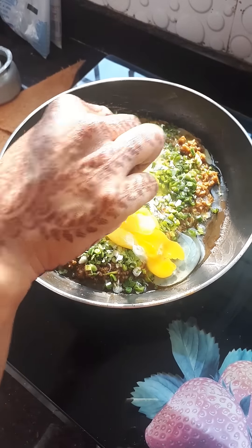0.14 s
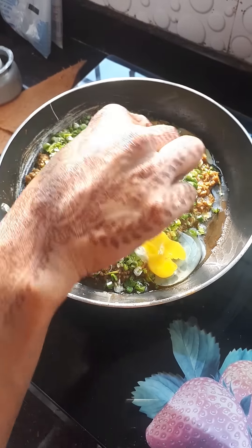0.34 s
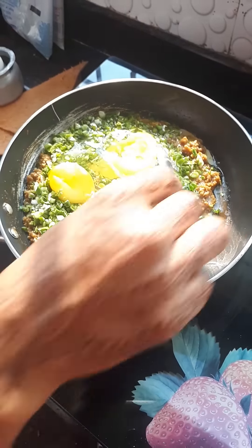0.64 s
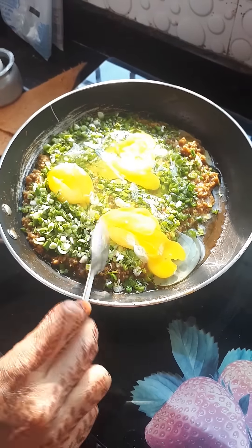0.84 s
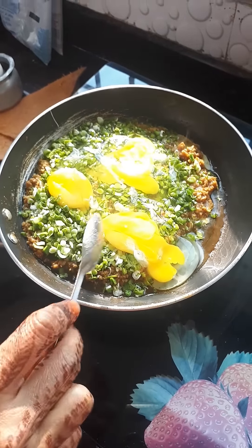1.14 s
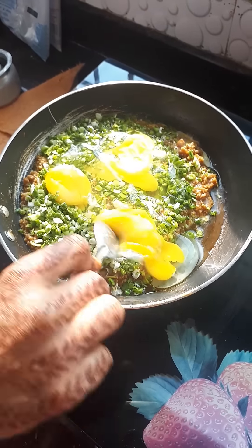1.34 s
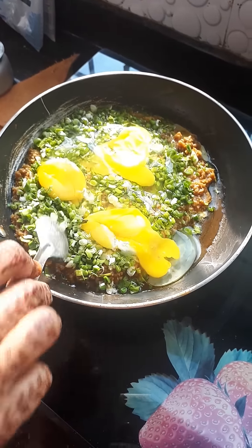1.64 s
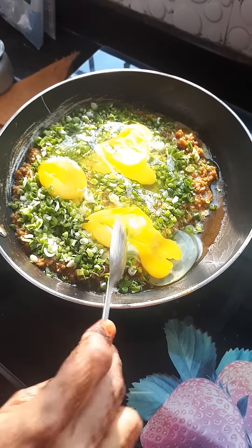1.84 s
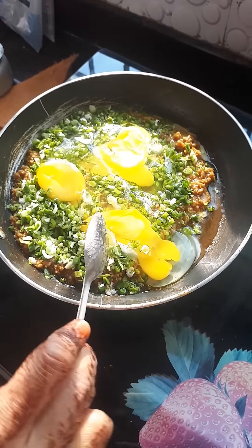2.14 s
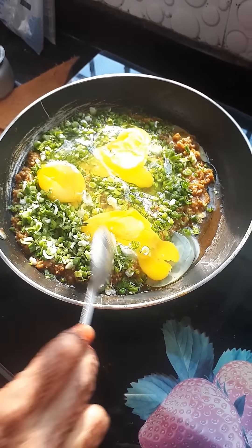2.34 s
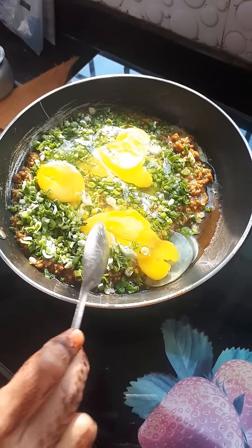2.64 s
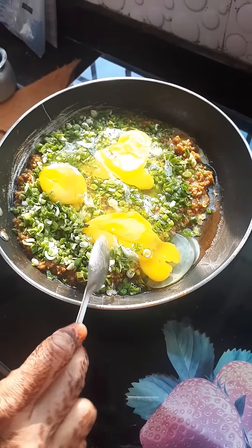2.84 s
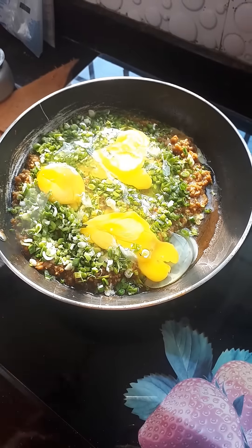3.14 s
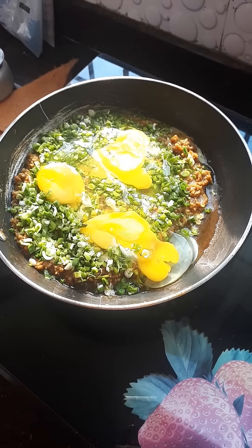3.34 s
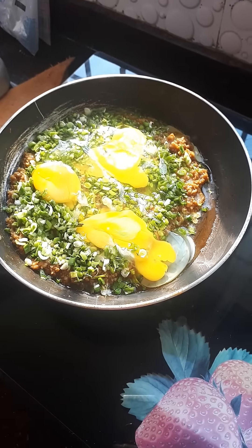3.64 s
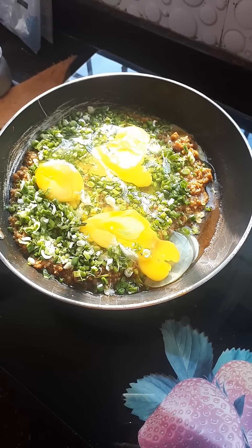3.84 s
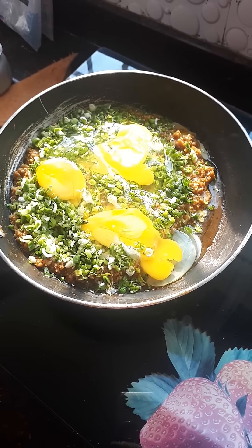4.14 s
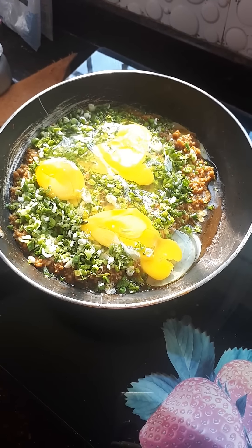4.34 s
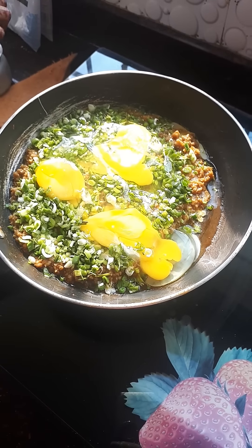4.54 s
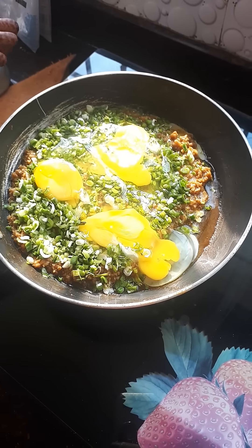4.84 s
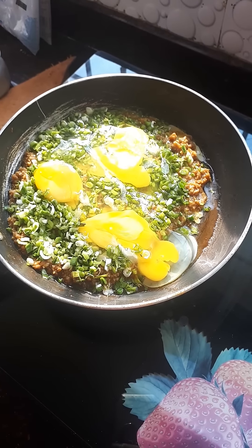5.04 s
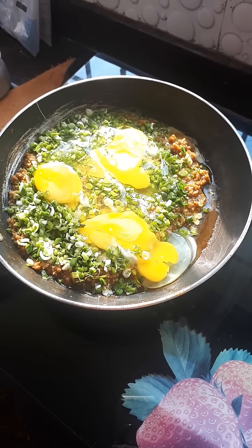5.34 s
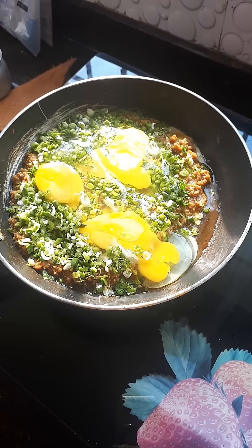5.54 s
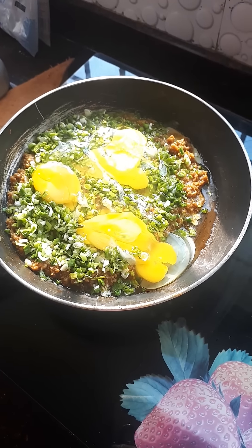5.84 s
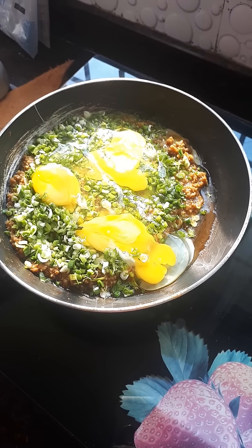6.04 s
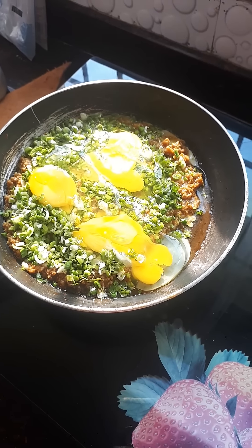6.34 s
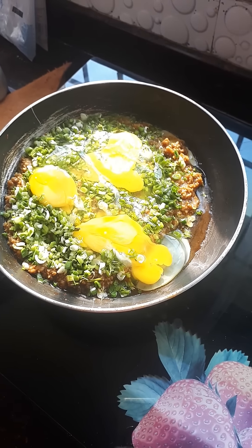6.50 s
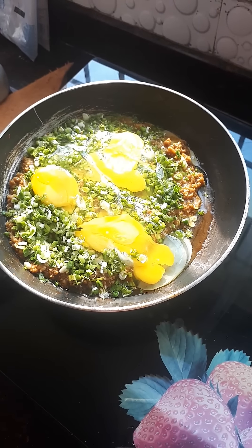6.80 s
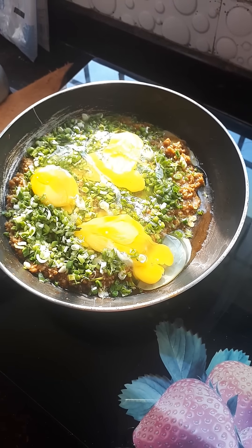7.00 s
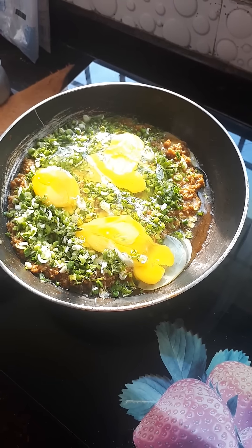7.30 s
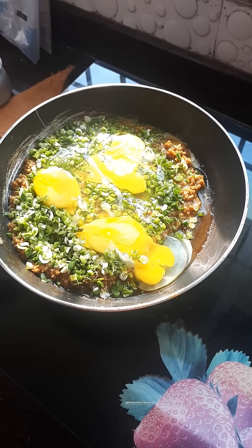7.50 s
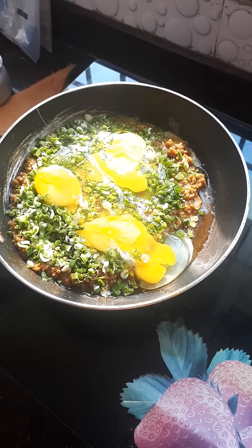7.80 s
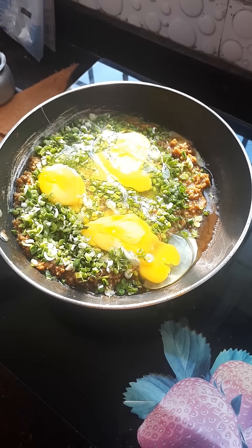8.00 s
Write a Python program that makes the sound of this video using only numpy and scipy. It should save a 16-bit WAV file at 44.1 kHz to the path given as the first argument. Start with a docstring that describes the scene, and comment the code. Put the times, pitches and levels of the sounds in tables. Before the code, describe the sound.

A quiet, hard-walled kitchen with low rumble, faint hiss and lively echoes. Three hollow knocks with cracking edges sound at 0.0, 0.3 and 0.55 s. Two loud spoon blows hit a steel pan at 0.9 and 1.07 s, broad cracks with brief metallic ringing damped by food. Softer knocks fall at 1.4 to 1.6 s, and a low steady hum switches on around 1.65 s. From 1.9 to 3.0 s the spoon chops evenly, eight blows about six per second, the later ones mostly brighter. The echo dies away. A very faint, high fluttering whistle runs from 3.4 to 4.85 s, dropping slightly in pitch near 4.5 s. Small knocks lead to a clear glass ting at 4.87 s; the hum stops near 4.95 s. A sharp loud clack lands at 5.47 s, then scattered lighter knocks. The hum returns at 6.9 s, with a faint glass touch at 7.15 s and last taps to 8.1 s.

```python
"""Shells and utensils knock on a kitchen worktop, over room rumble, a lingering echo and an on-and-off hum.
From about 0.9 to 3 s a spoon chops through egg yolks onto a steel pan: broad cracks, then ringing modes.
Next a thin, far whistle plays two fluttering tones, and more knocks ring through hollow, clack and metal.
From about 4.5 s touches on a small glass set two long modes ringing. The knocks go on nearly to the end.
Decaying noise adds the echoes of the hard walls."""
import sys
import numpy as np
from scipy import signal
from scipy.fft import irfft
from scipy.io import wavfile

SR = 44100
rng = np.random.default_rng(int(sys.argv[2]) if len(sys.argv) > 2 else 0)


def unload_wav(signal):
    """Save mono or channel-first audio to the path in sys.argv[1] as 16-bit WAV at rate SR, clipped to [-1, 1]."""
    wavfile.write(
        sys.argv[1],
        SR,
        np.round(np.clip(np.atleast_2d(signal).T, -1, 1) * 32767).astype(np.int16),
    )


N = 359856   # length in samples

# Colour of the room's rumble. Each row: pitch in Hz, relative strength per Hz in dB.
RUMBLE_COLOUR = [(22, -41.5), (60, -17), (105, -3.5), (160, -10.5), (280, -11), (500, -26), (1000, -22),
                 (2500, -41), (5000, -67), (9000, -64)]
# How alike left and right are. Each row: pitch in Hz, likeness (1 is the same, 0 is unrelated).
EAR_LIKENESS = [(30, 0.4), (100, 0.96), (300, 0.79), (700, 0.69), (1500, 0.3), (12000, 0.02)]
# How long the kitchen echoes. Each row: pitch in Hz, time to fall by 60 dB in seconds.
KITCHEN_DECAY = [(150, 0.5), (400, 0.65), (1000, 0.57), (2800, 0.54), (6000, 0.46), (9000, 0.3),
                 (14000, 0.24)]
# The hob heats in spells. Each row: on in seconds, off in seconds, level in dB.
HUM_SPELLS = [(-.2, .15, -54), (1.646, 4.95, -51.5), (6.913, 8.3, -48.5)]
# Bands of low noise in the room. Each row: pitch in Hz, width of each resonance in Hz, level in dB.
LOW_DRONES = [(112.6, 8, -57.5), (138, 29, -58.5)]
# Resonances that colour the lingering echo. Each row: pitch in Hz, width in Hz, relative level in dB.
LINGER_RESONANCES = [(615, 90, 8.5), (1260, 220, 5), (1500, 750, 1), (2300, 260, 3.5), (2920, 170, -10)]
# Whistled notes. Each row: start in seconds, length in seconds, pitch in Hz, starting level in dB,
# rise by the end in dB.
WHISTLE_NOTES = [(3.39, 1.08, 3382, -65, 6), (4.53, .33, 3050, -70, -3)]
# Touches on the glass. Each row: start in seconds, lower mode in dB, upper mode in dB relative to it.
GLASS_TOUCHES = [(4.545, -47.5, -29), (4.77, -43, -29), (4.87, -21.5, -25), (4.893, -40, 2.5),
                 (6.40, -44.5, -19), (7.152, -32.5, -36)]
# Modes of the glass. Each row: pitch in Hz, time to fall by 60 dB in seconds.
GLASS_MODES = [(2155, 0.4), (4518, 0.5)]
# Knocks on the worktop. Each row: start in seconds, hollow level in dB, hollow pitch in Hz, thud in dB,
# crack in dB, clack pitch in Hz, sheen in dB, echo in dB.
# Thud, crack, sheen and echo are relative to the hollow.
WORKTOP_KNOCKS = [(0.02, -15, 918, -16, -1, 2060, -12, -0.5), (0.288, -19, 896, -10, 0, 3150, -13, -0.5),
                  (0.546, -26.5, 917, -10.5, 0, 1930, -15, -0.5),
                  (1.386, -21, 900, -13, -42, 1940, -50, -7.5),
                  (1.418, -24.5, 950, -12, -30, 2060, -41, -10.5),
                  (1.627, -28, 920, -17.5, 10.5, 3560, -6.5, 1.5),
                  (3.712, -31.5, 1800, -2, -5.5, 4660, -40, 6), (3.806, -43.5, 743, -4, 3.5, 3200, -41, 5),
                  (4.394, -43.5, 1356, -15, -14, 5200, -14.5, 7),
                  (4.542, -42.5, 1435, -8, -10, 2960, -46, 9.5),
                  (4.768, -38, 1440, -23, -17, 2160, -40, 2.5), (4.87, -27, 1360, -30, -4, 3600, -25, 4),
                  (4.892, -30.5, 1050, -13, 4.5, 2300, -37, -1),
                  (4.905, -24.5, 1450, -18, -2, 3000, -16.5, -2.5),
                  (5.396, -34, 1500, -6, 7.5, 2530, -45, 8), (5.467, -12.5, 1560, -11, -5.5, 4550, 0.5, 0),
                  (5.697, -27, 1590, -11, -10, 2530, -13, 2),
                  (5.878, -21.5, 1450, -13, -12, 3030, -12.5, 2),
                  (6.15, -30, 1440, -8.5, -25, 1900, -9.5, 4), (6.224, -32.5, 1400, -5.5, -5, 2740, -10, 2),
                  (6.642, -44, 1404, -9, -37, 1880, -17, 10.5), (6.998, -41, 1250, -8, -39, 2240, -16, 8.5),
                  (7.036, -43, 1280, -4.5, -10, 3130, -11.5, 5),
                  (7.149, -29.5, 1520, -18, -29, 3650, -30, 8), (7.357, -32.5, 826, -6, -8.5, 1444, -43, 4),
                  (7.652, -34.5, 1210, -2.5, -20, 1830, -17.5, 7.5),
                  (7.677, -27.5, 1530, -3, -4, 3150, -13.5, 1.5),
                  (8.103, -34, 1610, -14.5, -17.5, 2504, -42, 5)]
# Broad parts of a knock, in order: thud, crack, sheen, top. Each row: low edge in Hz, high edge in Hz.
KNOCK_BANDS = [(560, 850), (2000, 5200), (5200, 7600), (7600, 15800)]
# Metal ringing in a knock's sheen. Each row: pitch in Hz, level relative to the sheen in dB.
METAL_MODES = [(4530, -12.5), (5020, -10), (6110, -25), (6605, -14), (7900, -12)]
# Spoon blows on the pan. Each row: start in seconds, peak in dB, tilt of the lows (thud) in dB,
# tilt of the highs (sheen) in dB.
SPOON_TAPS = [(0.892, -1.5, 4, -6.5), (1.07, 0, 0.5, -6.5), (1.904, 0, 0.8, -23.5), (2.072, 0, -0.1, -4.5),
              (2.24, 1, 0.1, -5.5), (2.398, 1, -0.1, -9.5), (2.563, 2.5, -1, 2), (2.712, 2, -0.6, -0.5),
              (2.887, -2.5, -2, -8), (3.019, 0.5, -1, 6.5)]
# Modes of the pan, damped by food. Each row: pitch in Hz, relative level in dB,
# time to fall by 60 dB in seconds.
PAN_MODES = [(282, -5, 0.12), (486, -11, 0.27), (716, -4, 0.32), (752, -6.5, 0.079), (1195, -4, 0.091),
             (2350, -5, 0.12), (2637, -5, 0.26), (3424, -14, 0.12), (4190, -14, 0.097), (4979, -13, .35),
             (5710, -7, 0.25), (5910, -9, 0.15), (6770, -15, 0.41), (6650, -23, 0.07), (7800, -31.5, 0.47),
             (10100, -24, 0.067)]
# Colour of the blow itself. Each row: pitch in Hz, relative strength per Hz in dB.
BLOW_COLOUR = [(59, -48.5), (100, -31), (267, -8.5), (352, -11.5), (392, -4), (528, -9.5), (697, -7),
               (1820, -10), (3450, -9.5), (6840, -18), (15100, -33.5), (16400, -45.5)]

RUMBLE_DB = -53.5
HUM_HZ, HUM_EDGE_S, HUM_WAVER_DB = 99.5, 0.027, 2.5
LINGER_FLOOR_DB = -67   # steady floor, before the blows swell it
LINGER_T60_S = 1.3   # a swell falls by 60 dB in this time
LINGER_KNOCK_DB, LINGER_TAP_DB = -15.5, -17   # how strongly knocks and taps drive the swell
WHISTLE_EDGE_S = 0.025
RATTLE_S, RATTLE_DB = 0.07, -16   # time scale of the loose bounces, and limit of each one's gain
TOP_UNDER_SHEEN_DB = 3
RIGHT_LAG = 12   # samples: near sounds reach the left first
HISS_DB, CUTOFF_HZ = -82.5, 17200


def from_db(db):
    """Turn decibels into a plain multiplier."""
    return 10 ** (np.asarray(db) / 20)


def rms_one(x):
    """Scale a sound to an average strength (RMS) of 1."""
    return x / np.sqrt(np.mean(x ** 2) + 1e-20)


def peak_one(x):
    """Scale a sound to a highest peak of 1."""
    return x / np.max(np.abs(x))


def at_hz(points, hz):
    """Read a table between its rows, with pitch spaced by octaves."""
    table = np.array(points)
    return np.interp(np.log(hz), np.log(table[:, 0]), table[:, 1])


def band(x, low_hz, high_hz):
    """Keep the part of a sound between two pitches."""
    edges = [low_hz, min(high_hz, .45 * SR)]
    return signal.sosfilt(signal.butter(2, edges, "band", fs=SR, output="sos"), x)


def resonate(x, hz, width_hz):
    """Ring at one pitch: a two-pole resonance with gain 1 on top."""
    r = np.exp(-np.pi * width_hz / SR)
    feed = np.array([1, 0, -1]) * (1 - r * r) / 2
    ring = [1, -2 * r * np.cos(2 * np.pi * hz / SR), r * r]
    return signal.lfilter(feed, ring, x)


def add(track, sound, s):
    """Mix a sound in at a time in seconds."""
    at = round(s * SR)
    track[..., at:at + sound.shape[-1]] += sound[..., :N - at]


def spell(on_s, off_s, edge_s):
    """Go from 0 to 1 and back, with soft edges."""
    return np.interp(np.arange(N) / SR, [on_s, on_s + edge_s, off_s - edge_s, off_s], [0, 1, 1, 0])


def stereo_bands(size, shape):
    """Half-octave bands of stereo noise, each alike in both ears by its pitch and scaled by shape(Hz)."""
    out, edges = 0, 22 * 2 ** np.arange(0, 10, .5)
    white = rng.standard_normal((2, 2, size))
    for k, (low, high) in enumerate(zip(edges, edges[1:])):
        mid, side = band(white[k % 2], low, high)   # neighbouring bands use separate noise
        hz = np.sqrt(low * high)
        alike = np.clip(at_hz(EAR_LIKENESS, hz), -1, 1)
        both = np.sqrt(1 + alike) * mid
        opposite = np.sqrt(1 - alike) * side * [[1], [-1]]
        out = out + shape(hz) * (both + opposite)
    return out


def contact(ms, size=8192):
    """A click smeared by bending waves: random all-pass filters keep its spectrum even."""
    out = np.zeros(size)
    out[0] = 1
    for share in rng.uniform(.1, .5, 4):
        lag = round(share * ms * SR / 1000) + 1
        loop = np.r_[1, np.zeros(lag - 1), .65]
        out = signal.lfilter(loop[::-1], loop, out + 1e-18)
    return out


def room_rumble():
    """The quiet room: steady stereo noise, coloured band by band."""
    noise = stereo_bands(N, lambda hz: from_db(at_hz(RUMBLE_COLOUR, hz)))
    return from_db(RUMBLE_DB) * rms_one(noise)


def kitchen(x, early_db, late_db):
    """Dense echoes that die band by band: a quick cluster off worktop and tiles, then the room's tail."""
    t = np.arange(SR) / SR

    def fading(hz):
        early = from_db(early_db - 60 * t / .07)
        late = from_db(late_db - 60 * t / at_hz(KITCHEN_DECAY, hz))
        return (1 - np.exp(-t / 0.0017)) * (early + late)

    return signal.fftconvolve(x[None], stereo_bands(SR, fading), axes=1)[:, :N]


def lingering_echo(blows):
    """A blurred echo of resonant noise: it swells after each blow and slowly dies, over a faint floor."""
    noise = rng.standard_normal((2, N))
    tones = sum(from_db(db) * rms_one(resonate(noise, hz, width)) for hz, width, db in LINGER_RESONANCES)
    keep = from_db(-120 / (LINGER_T60_S * SR))   # share of the swell's power left after one sample
    swell = signal.lfilter([1 - keep], [1, -keep], blows ** 2)
    power = from_db(2 * LINGER_FLOOR_DB) + swell
    return np.sqrt(power) * rms_one(tones)


def hum():
    """A mains tone that switches on and off and wavers in level, among narrow bands of low noise."""
    waver = from_db(HUM_WAVER_DB * rms_one(band(rng.standard_normal(N), 10, 20)))
    on = sum(from_db(db) * spell(on_s, off_s, HUM_EDGE_S) for on_s, off_s, db in HUM_SPELLS)
    tone = np.sqrt(2) * np.sin(2 * np.pi * HUM_HZ * np.arange(N) / SR)
    drones = np.zeros(N)
    for hz, width, db in LOW_DRONES:
        noise = rng.standard_normal(N)
        drones += from_db(db) * rms_one(resonate(resonate(noise, hz, width), hz, width))
    return on * waver * tone + drones


def whistle():
    """A fluttering tone: noise at flutter speed shakes the level of held notes that swell or fade."""
    t, notes = np.arange(N) / SR, np.zeros(N)
    flutter = 1 + .45 * rms_one(band(rng.standard_normal(N), 12, 70))
    for s, length, hz, db, swell_db in WHISTLE_NOTES:
        level = from_db(db + swell_db * np.clip((t - s) / length, 0, 1))
        notes += spell(s, s + length, WHISTLE_EDGE_S) * level * np.sin(2 * np.pi * hz * t)
    return flutter * notes


def glass():
    """Two long modes, pure tones that fade steadily, set ringing by each touch."""
    out, t = np.zeros(N), np.arange(SR) / SR
    soft_start = 1 - np.exp(-t / 0.0078)
    for s, db, upper_db in GLASS_TOUCHES:
        for (hz, t60), level_db in zip(GLASS_MODES, (db, db + upper_db)):
            fading = from_db(level_db - 60 * t / t60)
            add(out, fading * soft_start * np.sin(2 * np.pi * hz * t), s)
    return out


def knocks():
    """A contact rings briefly in a hollow, a higher clack and thin metal; broad bands carry the rest."""
    direct, to_room = np.zeros(N), np.zeros(N)
    for s, peak_db, hz, thud_db, crack_db, clack_hz, sheen_db, room_db in WORKTOP_KNOCKS:
        touch, strengths_db = contact(ms=1.2), rng.normal(0, 3, len(METAL_MODES))
        for late, size in rng.random((3, 2)):   # loose bounces follow
            bounce = np.roll(touch, round((.1 + late) * RATTLE_S * SR))
            touch = touch + from_db(RATTLE_DB * (1 + size)) * bounce
        hollow = resonate(resonate(touch, hz, width_hz=340), hz, width_hz=340)
        body = from_db(-12) * band(band(touch, 900, 2400), 730, 2400)
        sound = peak_one(hollow + body)
        sound = sound + from_db(crack_db - 2) * peak_one(resonate(touch, clack_hz, width_hz=220))
        for (metal_hz, db), strength_db in zip(METAL_MODES, strengths_db):
            metal = peak_one(resonate(touch, metal_hz, width_hz=90))
            sound = sound + from_db(sheen_db + db + strength_db) * metal
        levels_db = (thud_db, crack_db, sheen_db, sheen_db - TOP_UNDER_SHEEN_DB)
        for k, db in enumerate(levels_db):   # alternate signs join the bands
            sound = sound + (-1) ** k * from_db(db) * peak_one(band(touch, *KNOCK_BANDS[k]))
        add(direct, from_db(peak_db) * sound, s - .0004)
        add(to_room, from_db(peak_db + room_db) * sound, s - .0004)   # far knocks are mostly echo
    return direct, to_room


def spoon_taps():
    """Each blow is a broad crack; it leaves the modes of the pan ringing with new strengths."""
    cracks, rings = np.zeros(N), np.zeros(N)
    hz = np.maximum(np.fft.rfftfreq(4096, 1 / SR), 20)
    t = np.arange(SR // 2) / SR
    for s, peak_db, thud_db, sheen_db in SPOON_TAPS:
        blow = contact(ms=1.2)
        strengths = rng.normal(0, 1, len(PAN_MODES))
        shaking = rng.normal(0, 1, len(t))
        tilt_db = np.interp(np.log(hz), np.log([500, 1500, 4500, 8000]), [thud_db, 0, 0, sheen_db])
        colour = irfft(from_db(at_hz(BLOW_COLOUR, hz) + tilt_db))
        crack = signal.fftconvolve(blow, np.roll(colour, 16)[:512])   # a short filter made from the colour
        add(cracks, from_db(peak_db) * peak_one(crack), s - .0006)
        for k, (mode_hz, db, t60) in enumerate(PAN_MODES):
            start_db = peak_db - 19.5 + db + np.interp(mode_hz, hz, tilt_db) + 3.1 * strengths[k]
            # food spreads each mode into a rough cluster
            cluster = rms_one(resonate(shaking, mode_hz, width_hz=22 + .016 * mode_hz))
            add(rings, from_db(start_db - 60 * t / t60) * cluster, s)
    return band(cracks, 90, 19000), rings


def scene():
    """Near sounds with their echoes over hum, rumble and a lingering echo."""
    cracks, rings = spoon_taps()
    around, around_room = knocks()
    tones = glass() + whistle()
    balance = from_db([[.4], [-.4]])   # left is slightly louder
    near = cracks + around + rings + tones
    near = np.array([near, np.roll(near, RIGHT_LAG)]) * balance
    sustained = from_db(-8) * (rings + tones)
    echoes = kitchen(cracks + around_room + sustained, early_db=-32, late_db=-37) * balance
    linger = lingering_echo(from_db(LINGER_KNOCK_DB) * around_room + from_db(LINGER_TAP_DB) * cracks)
    return near + echoes + hum() + room_rumble() + linger


def record(dry):
    """The microphones lose the deep bass and add a faint hiss; peaks are rounded, the top is cut."""
    thin = signal.sosfilt(signal.butter(3, 62, "high", fs=SR, output="sos"), dry)
    rounded = 1.152 * np.tanh(thin / 1.38)
    heard = rounded + from_db(HISS_DB) * rng.standard_normal(dry.shape)
    return signal.sosfilt(signal.cheby2(14, 80, CUTOFF_HZ, fs=SR, output="sos"), heard)


dry = scene()
out = record(dry)
unload_wav(out)
```